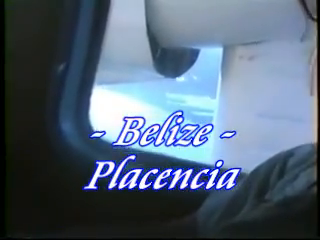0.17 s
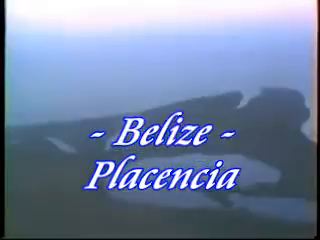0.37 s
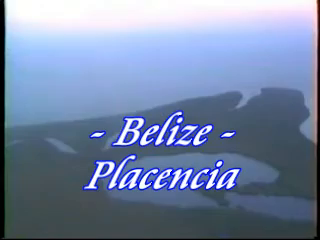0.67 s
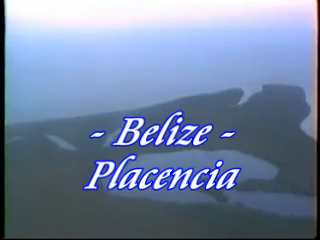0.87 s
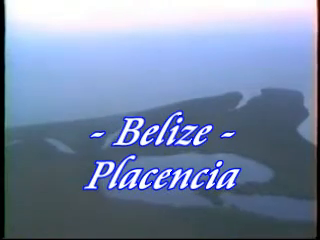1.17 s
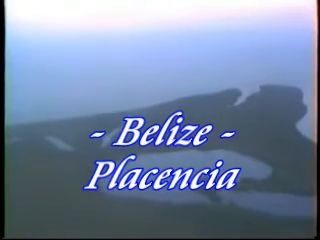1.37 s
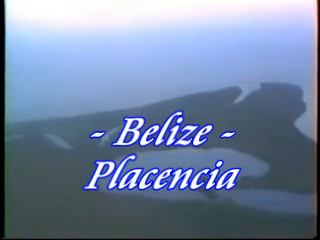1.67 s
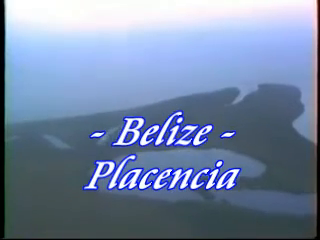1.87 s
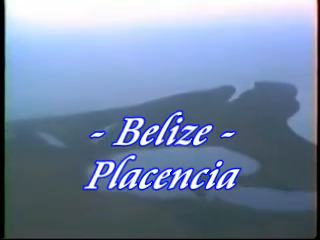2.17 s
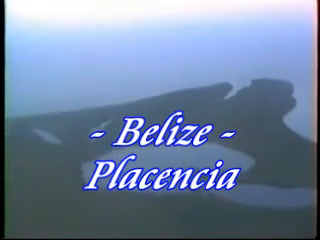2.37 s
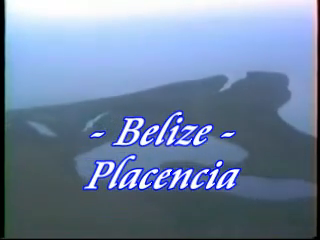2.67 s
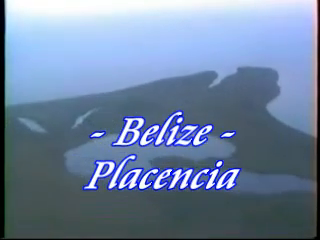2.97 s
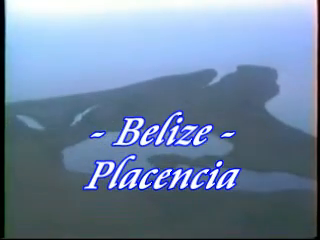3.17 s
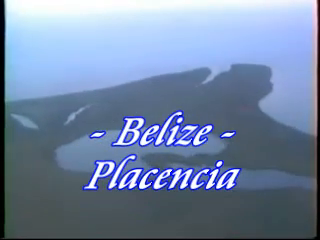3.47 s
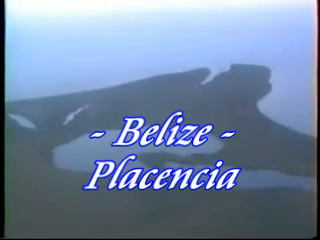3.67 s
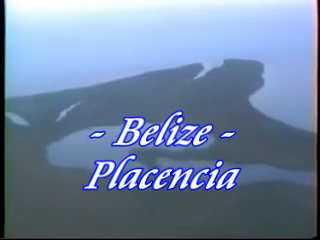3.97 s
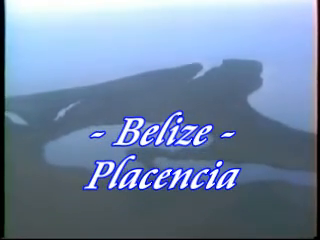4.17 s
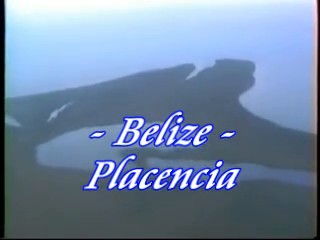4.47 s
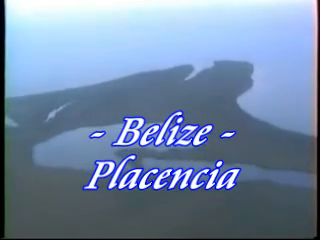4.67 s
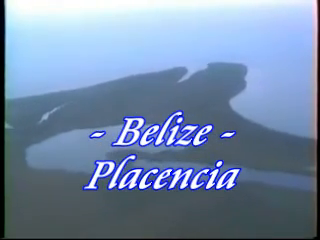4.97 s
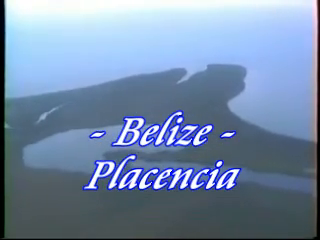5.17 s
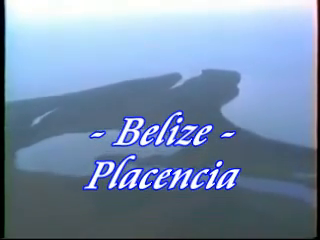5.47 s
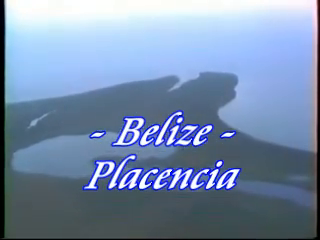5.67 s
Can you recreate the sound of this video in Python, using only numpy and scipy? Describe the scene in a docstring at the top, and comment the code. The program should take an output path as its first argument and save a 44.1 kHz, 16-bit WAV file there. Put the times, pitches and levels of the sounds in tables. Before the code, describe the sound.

A light propeller plane's engine drones steadily, heard inside the cabin, with low booming tones under a wide, slightly distorted rush of air.

```python
"""Inside the cabin of a light propeller plane in level flight, on an old camcorder's single microphone.
Propeller and exhaust tones boom under the rush of the slipstream; the scene changes near the start, leaving the
drone a little lower in pitch, and its balance shifts as the microphone moves among the cabin's standing waves.
The tones overload the microphone, so the hiss is chopped at every pressure crest. From the step on, a skewed
tape head dulls the treble and draws a slowly rising notch through it."""
import sys
import numpy as np
from scipy import signal
from scipy.fft import rfft, irfft, next_fast_len
from scipy.io import wavfile
from scipy.ndimage import map_coordinates

SR = 44100
rng = np.random.default_rng(int(sys.argv[2]) if len(sys.argv) > 2 else 0)


def dump_mix(stems):
    """Bounce the given channels to the path in sys.argv[1] as a 16-bit WAV at rate SR."""
    frames = np.atleast_2d(stems).T  # one column per channel
    limited = np.clip(frames, -1, 1)  # hard clip at full scale
    pcm = np.round(limited * 32767).astype(np.int16)
    wavfile.write(sys.argv[1], SR, pcm)


N = 256662

# Spots in the cabin where the microphone rests. Each row: arrival and departure in seconds, then levels
# in dB of the blade rate, exhaust firing, two, three and four times the blade rate, fifth and seventh
# engine orders, exhaust rasp, growl, buffeting, rush and hiss.
MIC_SPOTS = [(0, 0.431, -30, -28, -16, -30, -51.5, -32, -60, -56, -41.5, -28.5, -34, -38.5),
             (0.501, 1.0, -36.5, -30, -19, -27, -54, -35, -46, -55.5, -43.5, -24.5, -30, -36),
             (1.22, 1.552, -36.5, -25, -20.5, -27.5, -49, -38, -38, -51.5, -43.5, -24, -30, -35),
             (2.101, 2.567, -22.5, -19, -31, -27, -34.5, -29.5, -37, -50, -43, -23, -29, -35.5),
             (2.824, 3.0, -18, -19, -26.5, -28, -30, -45, -41, -35.5, -42.5, -25.3, -30, -35),
             (3.352, 3.9, -16, -24.5, -20, -24, -37, -53, -47.5, -38.5, -42, -24.5, -29, -35),
             (4.607, 5.82, -16, -30, -19, -23.5, -43, -43.5, -53, -44, -43.5, -25, -30, -34)]
# Growl of the uneven cylinders. Each row: frequency in Hz, relative level of a line there in dB.
GROWL_SPECTRUM = [(38, -8.5), (57, 13), (95, -14), (135, 2.5), (190, 6), (265, -6), (340, -6.5), (430, -4),
                  (550, -10.5), (800, -28)]
# Slipstream from inside: low buffeting, mid rush, high hiss. Each row: frequency in Hz, relative dB.
BUFFET_SPECTRUM = [(25, -29), (50, -6), (100, 1), (180, 3), (260, 0.5), (400, -11.5), (700, -34),
                   (1500, -62.5)]
RUSH_SPECTRUM = [(150, -21), (350, 1.5), (500, -4), (800, -7), (1150, -4.5), (1600, -16.5), (2500, -15),
                 (5000, -46)]
HISS_SPECTRUM = [(600, -30.5), (1400, -3), (2200, 4), (2800, 0), (3600, -6.5), (5000, -13.5), (6000, -18),
                 (7200, -36), (12000, -52.5)]
# Creep of the head's skew after the step. Each row: time in seconds, lowest cancelled frequency in Hz.
SKEW_NOTCH = [(.44, 3040), (.8, 3160), (1.05, 3510), (1.17, 3520), (1.27, 3830), (1.62, 3480), (2.15, 3800),
              (2.35, 3990), (2.62, 4000), (3.1, 4530), (3.5, 4970), (4.1, 5670), (5.82, 6180)]
# The tape's response throughout, and its treble loss before the step. Each row: frequency in Hz, gain in dB.
TAPE_RESPONSE = [(100, 1), (3000, 0), (5500, 10), (7200, 5), (9000, 0), (14000, -1)]
EARLY_TREBLE_LOSS = [(1000, 0), (3000, -7), (4000, -9), (5000, -14.5), (6000, -22), (8000, -12.5)]
# Mismatch of the two channels. Each row: frequency in Hz, left minus right in dB.
CHANNEL_BALANCE = [(300, 0), (700, -.45), (1400, -1.2), (2800, -1.1), (5000, -.4)]
# Faint hiss, separate in each channel, and playback hiss, the same in both.
# Each row: frequency in Hz, relative level in dB.
CHANNEL_HISS = [(150, -37.5), (600, -2.5), (1500, -1.5), (3000, -3), (5500, -4), (8000, -13), (13000, -18)]
PLAYBACK_HISS_SPECTRUM = [(3000, -8), (5000, -4), (6200, 0), (7200, -5), (8500, -18), (13000, -28)]

EARLY_SHAFT_HZ, CRUISE_SHAFT_HZ = 39.2, 37.69   # crankshaft turns a second before and after the step
STEP_S, STEP_GLIDE_S = .44, .058
SWELL_S, SWELL_WIDTH_S, SWELL_DB = .076, .08, 7.5   # the rush swells briefly at the start
OVERTONE_WAVER_DB, HISS_FLUTTER_DB = 1.5, .9
EARLY_OVERLOAD, CRUISE_OVERLOAD = .16, .15   # pressure at which the input flattens, before and after
CHANNEL_HISS_DB, PLAYBACK_HISS_DB = -53.5, -72


def propeller(shaft, first_db, second_db, third_db, fourth_db):
    """Two blades make a sawtooth of pressure whose upper harmonics are less steady."""
    blade = 2 * shaft
    # the cabin turns the third harmonic a quarter cycle back, the fourth a quarter on
    third = tone(3 * blade - np.pi / 2, third_db, waver_db=1.03)
    fourth = tone(4 * blade + np.pi / 2, fourth_db, OVERTONE_WAVER_DB)
    return tone(blade, first_db) + tone(2 * blade, second_db) + third + fourth


def exhaust(shaft, firing_db, fifth_db, seventh_db, rasp_db):
    """Six cylinders fire three times a turn; the fifth and seventh orders beat against the firing."""
    firing = tone(3 * shaft + np.pi / 2, firing_db)   # crest at top dead centre
    # the firing's third and fourth harmonics rasp
    rasp = tone(9 * shaft + np.pi / 2, rasp_db, OVERTONE_WAVER_DB)
    rasp -= tone(12 * shaft, firing_db - 22.5, OVERTONE_WAVER_DB)
    return firing + rasp + tone(5 * shaft, fifth_db) + tone(7 * shaft, seventh_db, OVERTONE_WAVER_DB)


def slipstream(shaft, buffet_db, rush_db, hiss_db):
    """Turbulence shakes the cabin's skin and hisses along the window seals, throbbing with the blades."""
    swell_db = SWELL_DB * np.exp(-((np.arange(N) / SR - SWELL_S) / SWELL_WIDTH_S) ** 2)
    rush = from_db(rush_db + swell_db) * noise(RUSH_SPECTRUM)
    hiss = from_db(hiss_db + HISS_FLUTTER_DB * drift(CRUISE_SHAFT_HZ)) * noise(HISS_SPECTRUM)
    buffet = from_db(buffet_db) * noise(BUFFET_SPECTRUM)
    throb = 1 + .2 * np.cos(shaft)   # once a turn, as the blades are unequal
    return buffet + throb * (rush + hiss)


def growl(shaft, level_db, waver_db=3.5, wander_rad=.07):
    """Unequal cylinders repeat every second turn and fill in weak, restless lines at the half orders."""
    orders = np.arange(2, 42) / 2
    phases = rng.uniform(0, 2 * np.pi, len(orders))
    lines = np.zeros(N)
    for order, phase in zip(orders, phases):
        angle = order * (shaft + wander_rad * drift(5)) + phase
        lines += tone(angle, level_db + at_hz(GROWL_SPECTRUM, order * CRUISE_SHAFT_HZ), waver_db)
    return lines


def levels_at_microphone():
    """Levels in dB along the microphone's path: held at each spot, gliding in pressure between spots."""
    rests = [(s, *from_db(levels_db)) for arrives, leaves, *levels_db in MIC_SPOTS
             for s in (arrives, leaves)]
    return 20 * np.log10(in_time(rests))


def microphone(pressure, overload, hardness=8.4, vent_hz=22.1, low_cut_hz=114):
    """The overloaded input flattens every crest and is deaf to the hiss while it does."""
    vent = signal.butter(1, vent_hz, "high", fs=SR, output="sos")   # slow pressure leaks past the capsule
    low_cut = signal.butter(2, low_cut_hz, "high", fs=SR, output="sos")   # tilts the flat tops
    pressure = signal.sosfilt(vent, pressure)
    squashed = pressure / (1 + np.abs(pressure / overload) ** hardness) ** (1 / hardness)
    return signal.sosfilt(low_cut, squashed)


def skewed_head(track, notch_hz, strips=6):
    """Strips of the track are read slightly apart in time, cancelling one band and dulling all above."""
    across = (np.arange(strips)[:, None] + .5) / strips - .5
    lag = SR / notch_hz * (1 + .016 * drift(20))   # the tape weaves on the head
    read_at = SR // 10 + np.arange(N) + across * lag
    return map_coordinates(track, [read_at], order=3).mean(axis=0)


def tape(x):
    """The tape is plainly dull up to the step; there the head's skew sets in at once, then creeps back."""
    track = signal.hilbert(mirrored(x)).imag   # magnetic playback turns every frequency a quarter cycle
    dull = coloured(track[SR // 10:][:N], EARLY_TREBLE_LOSS)
    notched = skewed_head(track, in_time(SKEW_NOTCH)[0])
    return coloured(stepped(dull, notched, fade_s=.003), TAPE_RESPONSE)


def tone(angle, level_db, waver_db=1.0):
    """A sine that wavers about a given rms level."""
    return np.sqrt(2) * from_db(level_db + waver_db * drift(12)) * np.sin(angle)


def noise(spectrum):
    """Noise of a given colour, rms 1."""
    size = next_fast_len(N)
    gain = from_db(at_hz(spectrum, np.fft.rfftfreq(size, 1 / SR)))
    x = irfft(rfft(rng.standard_normal(size)) * gain, size)[:N]
    return x / np.sqrt(np.mean(x ** 2) + 1e-20)


def drift(rate_hz):
    """A random wander of spread about 1 that turns rate_hz times a second."""
    knots = rng.standard_normal(2000)
    return np.interp(np.arange(N) / SR * rate_hz, np.arange(len(knots)), knots)


def stepped(before, after, fade_s=STEP_GLIDE_S):
    """One value up to the step, then a quick fade to another."""
    done = np.clip((np.arange(N) / SR - STEP_S) / fade_s + .5, 0, 1)
    return before + done * (after - before)


def coloured(x, response, share=1):
    """Filter a sound by a smooth response, its dB scaled by share."""
    x = mirrored(x)
    gain = from_db(share * at_hz(response, np.fft.rfftfreq(len(x), 1 / SR)))
    return irfft(rfft(x) * gain, len(x))[SR // 10:][:N]


def mirrored(x):
    """Run a sound on past both ends, so that filters see no edge; it starts a tenth of a second in."""
    lead = SR // 10
    return np.pad(x, (lead, next_fast_len(N + 2 * lead) - N - lead), "reflect")


def in_time(rows):
    """Each column of a timed table at every sample."""
    times_s, *columns = np.transpose(rows)
    return [np.interp(np.arange(N) / SR, times_s, column) for column in columns]


def at_hz(spectrum, hz):
    """Read a spectrum on a log-frequency axis."""
    known_hz, values = np.transpose(spectrum)
    return np.interp(np.log(np.maximum(hz, 1)), np.log(known_hz), values)


def from_db(db):
    """Decibels to gain."""
    return 10 ** (np.asarray(db) / 20)


def scene():
    """Cabin pressure at the single moving microphone, the same in both channels."""
    shaft = 2 * np.pi * np.cumsum(stepped(EARLY_SHAFT_HZ, CRUISE_SHAFT_HZ)) / SR   # angle in radians
    (first_db, firing_db, second_db, third_db, fourth_db, fifth_db, seventh_db,
     rasp_db, growl_db, buffet_db, rush_db, hiss_db) = levels_at_microphone()
    cabin = exhaust(shaft, firing_db, fifth_db, seventh_db, rasp_db) + growl(shaft, growl_db)
    cabin += propeller(shaft, first_db, second_db, third_db, fourth_db)
    cabin += slipstream(shaft, buffet_db, rush_db, hiss_db)
    return np.array([cabin, cabin])


def record(dry):
    """One overloaded microphone feeds two slightly unequal, hissing tape channels; the top is cut off."""
    feed = microphone(dry.mean(axis=0), stepped(EARLY_OVERLOAD, CRUISE_OVERLOAD))
    tracks = []
    for share in (.5, -.5):   # left, right
        channel_hiss = from_db(CHANNEL_HISS_DB) * noise(CHANNEL_HISS)
        tracks.append(tape(coloured(feed, CHANNEL_BALANCE, share) + channel_hiss))
    played = np.array(tracks) + from_db(PLAYBACK_HISS_DB) * noise(PLAYBACK_HISS_SPECTRUM)
    high_cut = signal.cheby2(12, 70, 13800, fs=SR, output="sos")   # 70 dB down from 13.8 kHz
    return signal.sosfilt(high_cut, played)


dry = scene()
out = record(dry)
dump_mix(out)
```